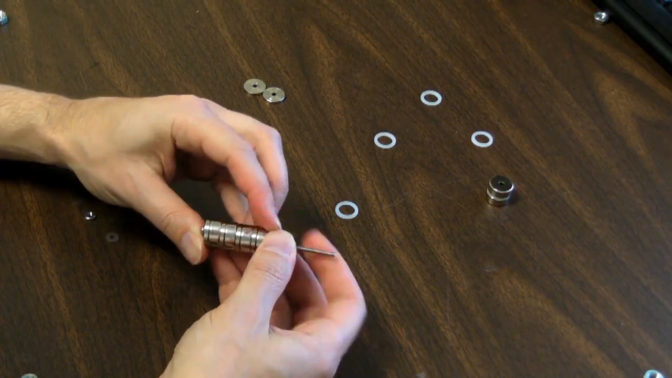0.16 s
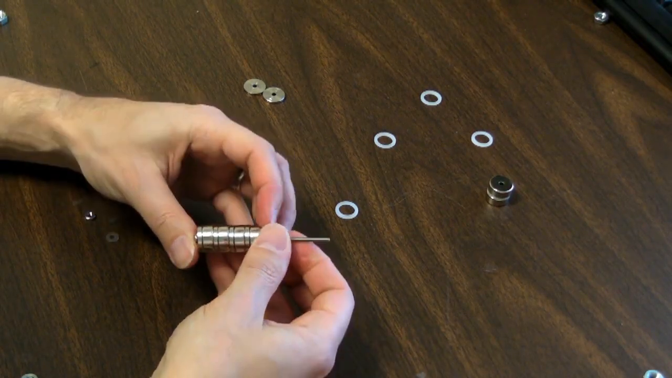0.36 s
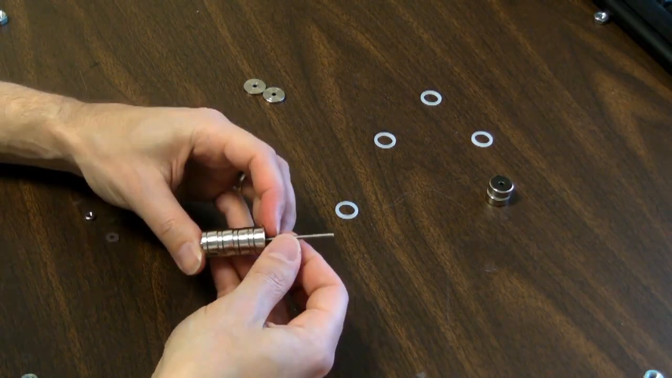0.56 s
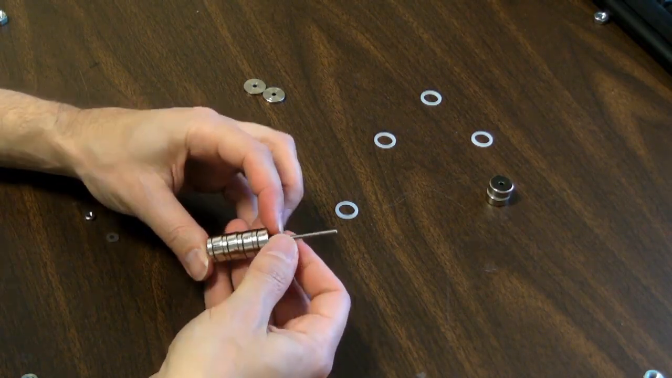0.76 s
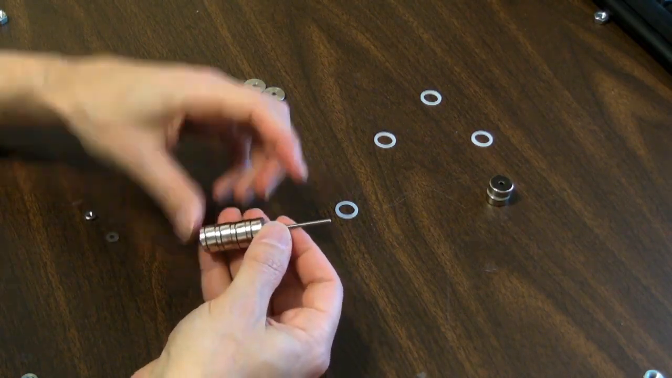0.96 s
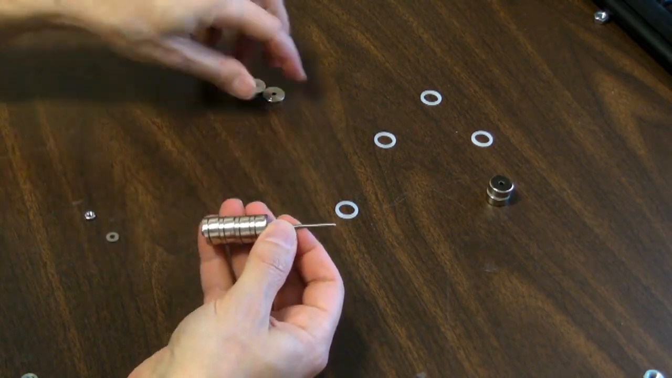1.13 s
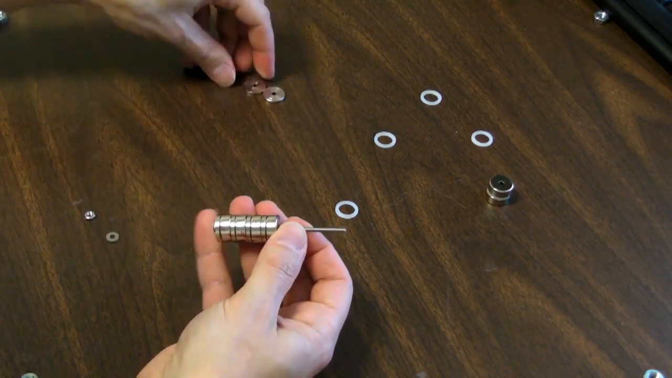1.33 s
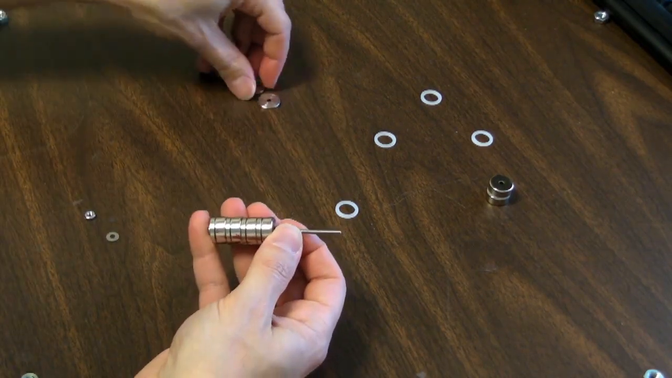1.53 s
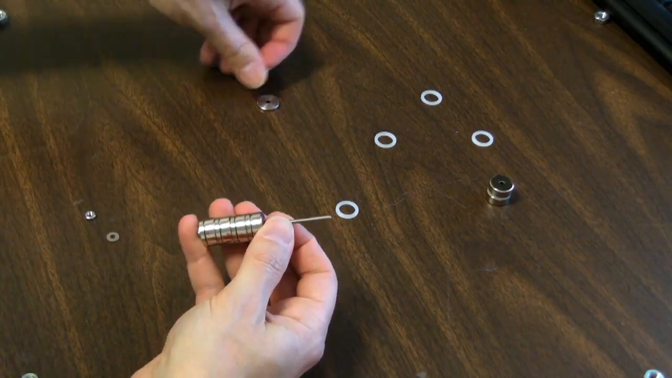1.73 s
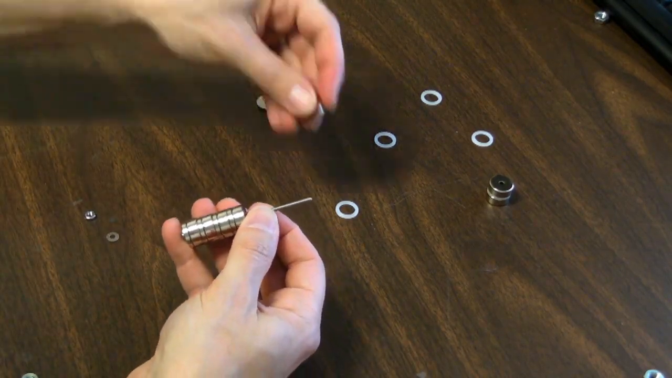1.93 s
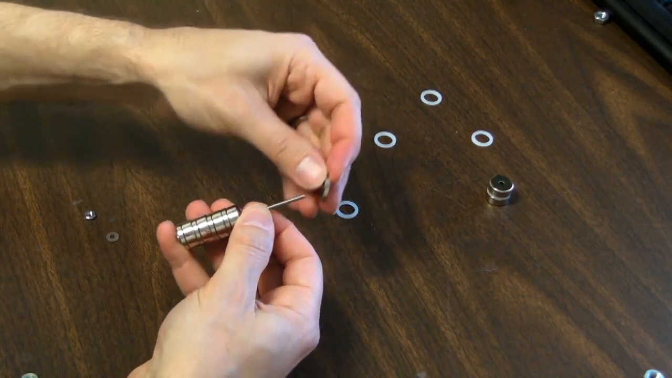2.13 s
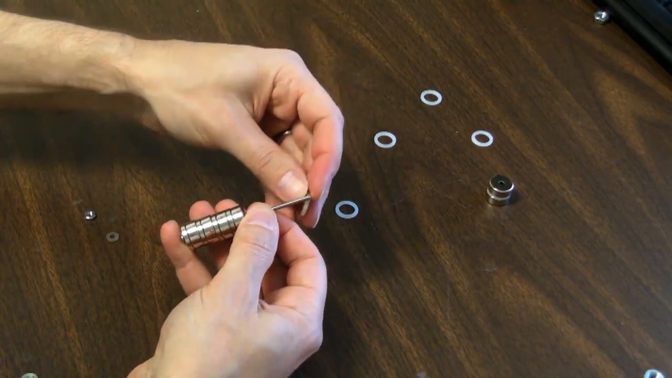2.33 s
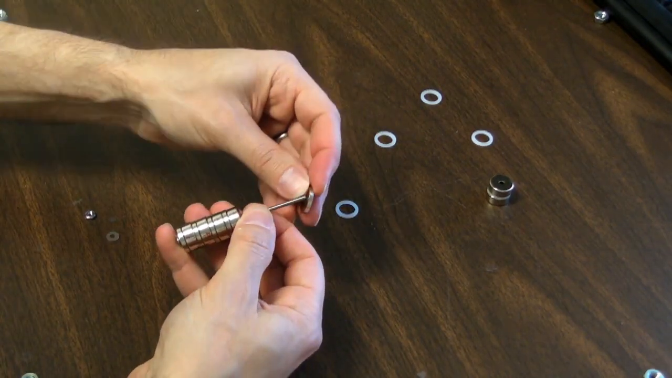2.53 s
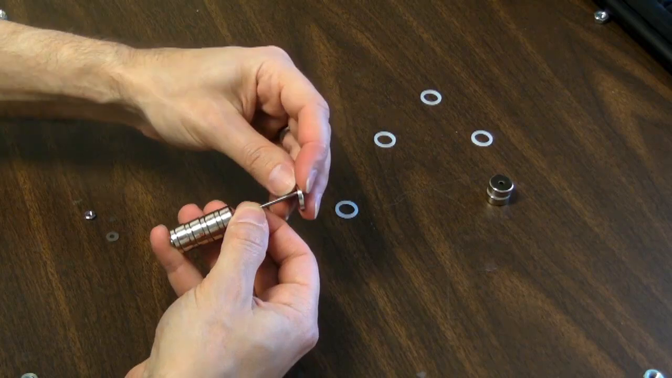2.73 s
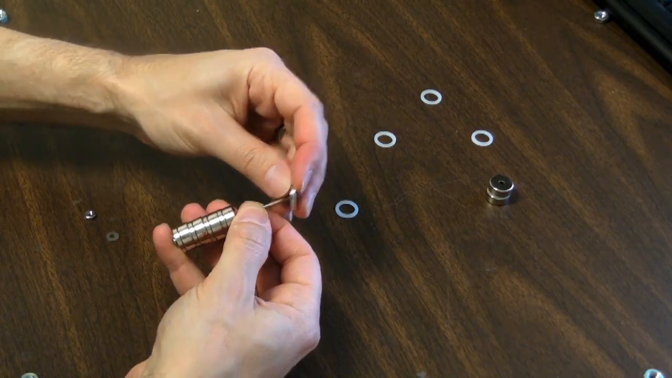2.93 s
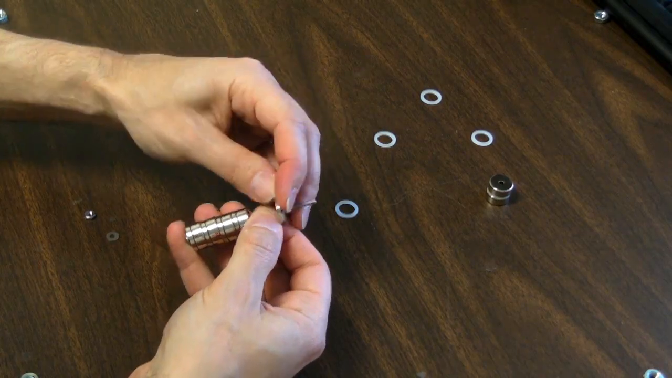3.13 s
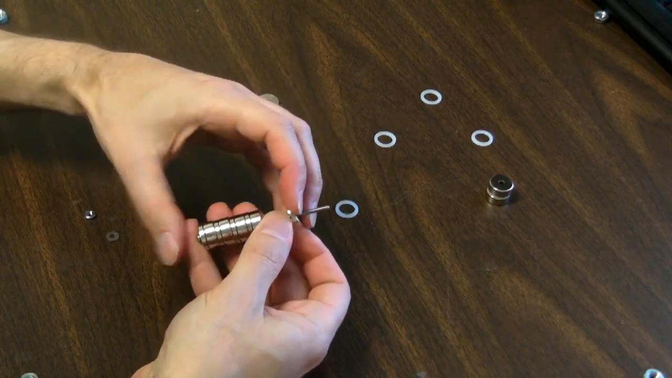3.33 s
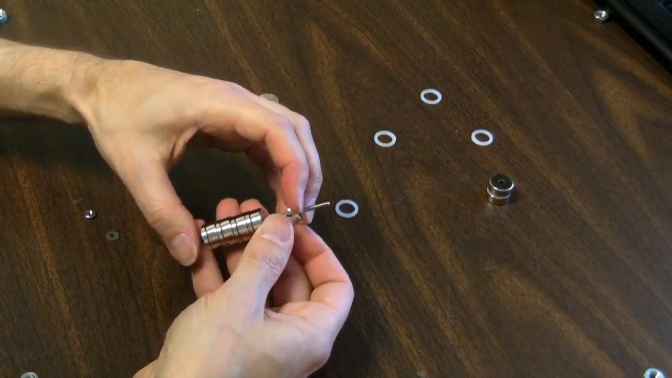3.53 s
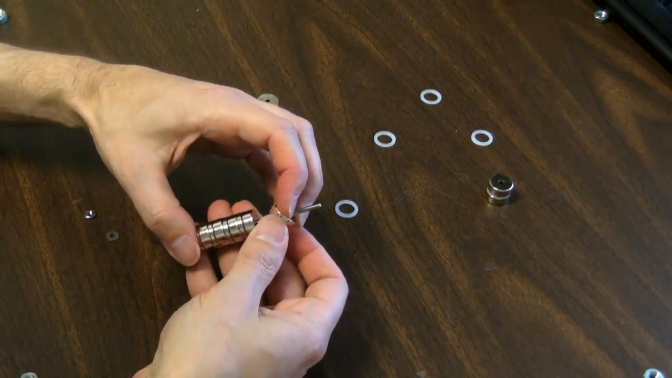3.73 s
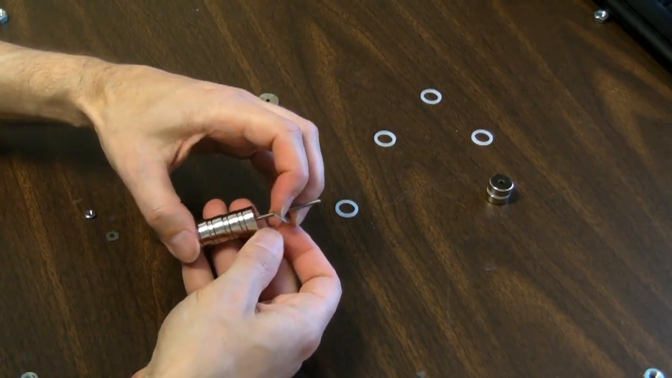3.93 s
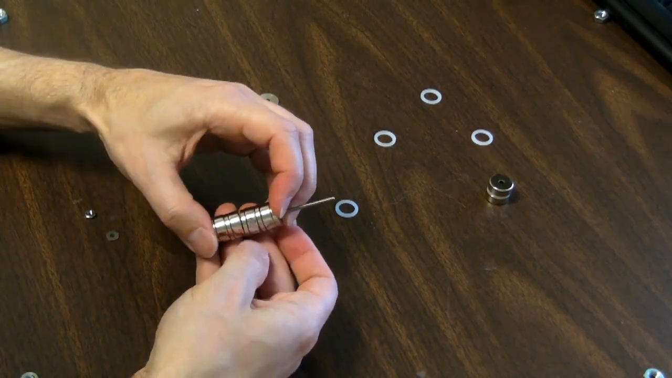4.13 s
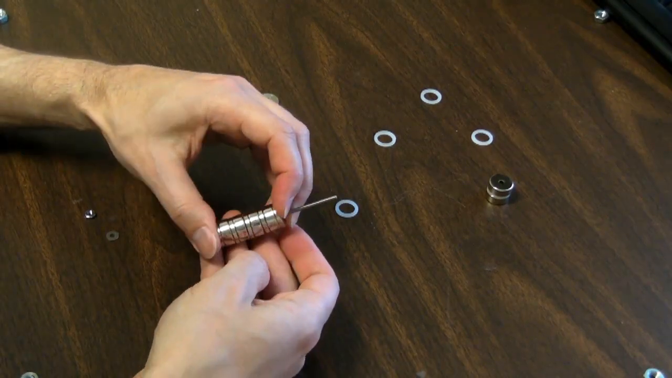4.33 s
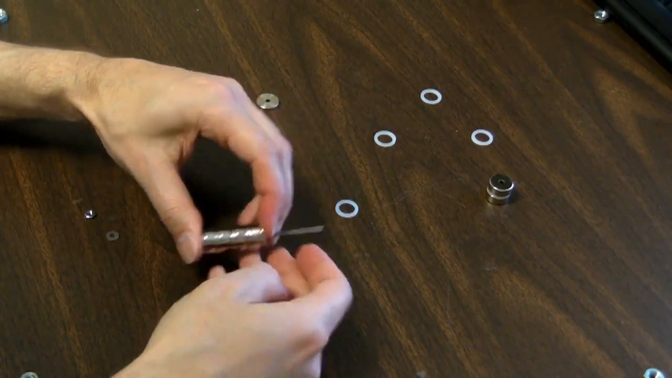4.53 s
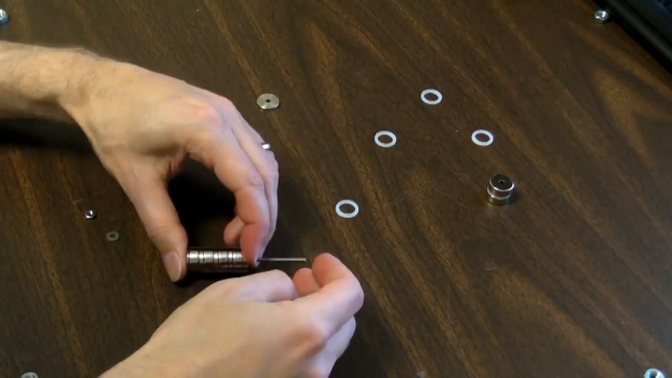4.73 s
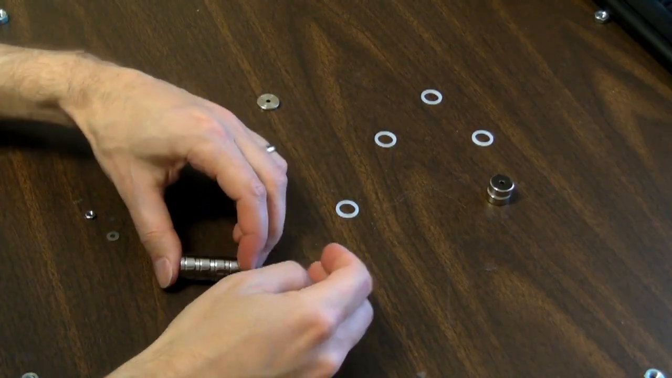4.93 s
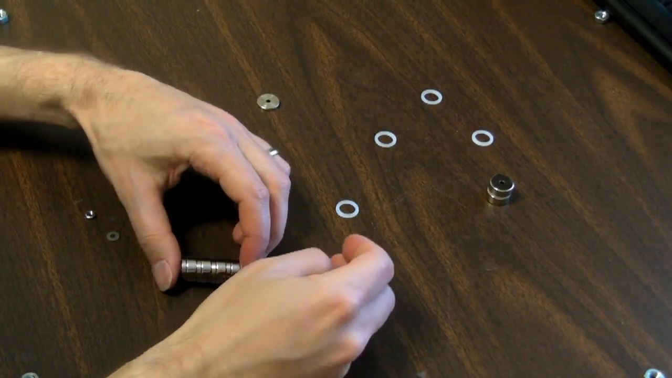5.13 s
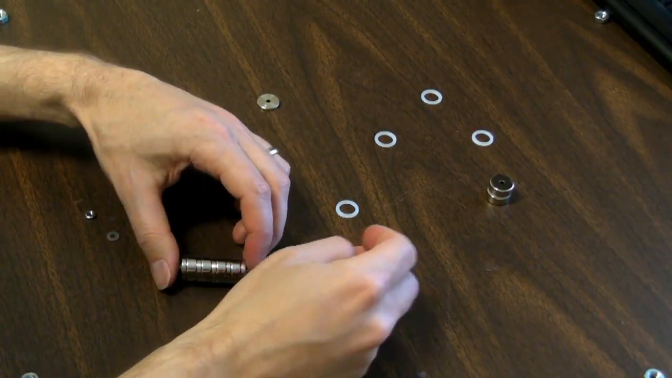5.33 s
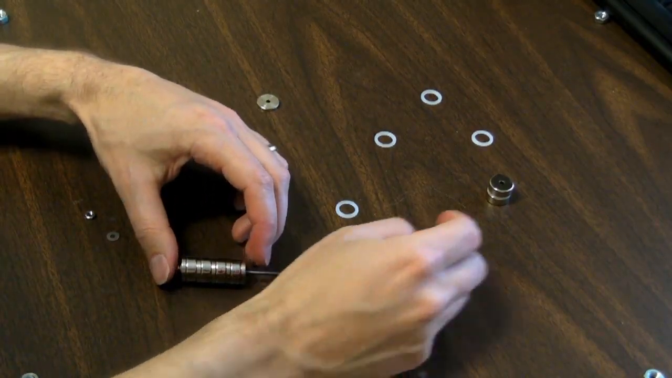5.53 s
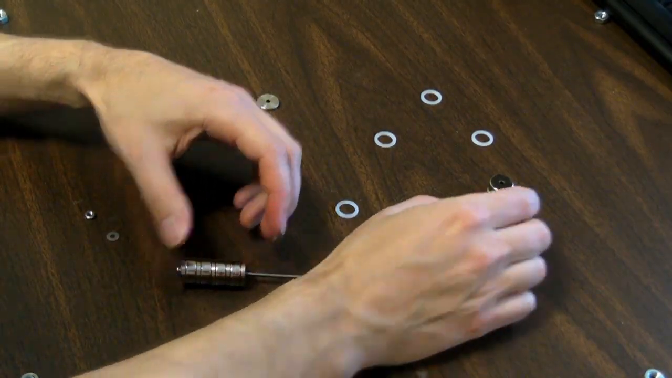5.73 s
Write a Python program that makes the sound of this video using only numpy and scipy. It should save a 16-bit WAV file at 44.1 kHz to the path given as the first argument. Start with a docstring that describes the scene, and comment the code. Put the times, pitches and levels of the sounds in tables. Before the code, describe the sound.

Small metallic clicks and scrapes end in two sharp magnetic snaps and a brief rattle on wood, over faint hum.

```python
"""A small room, ringing over the hum of appliances. Skin and sleeve brush; fingers knock on a wooden
table, drag washers over it and flip one up. Hands thread a steel washer on a screw: it rubs and
chatters over the thread, then snaps onto a stack of ring magnets. The stack is laid down and rocks
to rest. Blows ring decaying modes of wood, steel and stack; friction is a train of tiny slips."""
import sys
import numpy as np
from scipy import signal
from scipy.fft import rfft, irfft
from scipy.io import wavfile
from scipy.ndimage import uniform_filter1d, minimum_filter1d

SR = 44100
rng = np.random.default_rng(int(sys.argv[2]) if len(sys.argv) > 2 else 0)


def inscribe(sig):
    """Save sig as 16-bit PCM at rate SR to the path in sys.argv[1].

    A 1-D sig is mono; a 2-D sig holds one channel per row.
    Samples are clipped to [-1, 1] before scaling.
    """
    pcm = np.round(np.clip(np.atleast_2d(sig).T, -1, 1) * 32767)
    wavfile.write(sys.argv[1], SR, pcm.astype(np.int16))


N = 259296
T = np.arange(N) / SR

# fan and microphone hiss: f/Hz, density/dB
AIR_SPECTRUM = [(12, -65), (20, -31), (86, -12), (116, -18), (145, -10.5), (177, -11), (284, -20.5),
                (346, -8.5), (376, -8), (497, -11.5), (541, -12.5), (823, -19), (1750, -20.5),
                (13100, -25.5), (15900, -27)]
# hiss, left-right: f/Hz, coherence/0-1
AIR_COHERENCE = [(60, 0.03), (130, 0.63), (290, 0.7), (640, 0.69), (1410, 0.27), (3100, 0.68), (6820, 0),
                 (15000, 0)]
# motor lines: f/Hz, level/dB
HUM_LINES = [(351, -66), (533.7, -67.5), (299, -80.5), (432.5, -74), (596, -81.5), (668, -78.5),
             (1150, -91.5)]
# room decay: f/Hz, t60/s
ROOM_DECAY = [(200, 0.45), (800, 0.31), (2500, 0.2), (4000, 0.29), (6500, 0.27), (12000, 0.25),
              (16000, 0.24)]
# room tail, left-right: f/Hz, coherence/0-1
ROOM_COHERENCE = [(200, 1), (800, 0.82), (2500, 0.65), (6000, 0.03), (12000, 0)]
# skin and sleeve: t/s, level/dB
BRUSH_LEVELS = [(0, -85), (.8, -79), (1., -59.5), (1.5, -80), (2., -82), (4.4, -83), (4.55, -60),
                (4.7, -61), (5.35, -60.5), (5.65, -56.5), (5.88, -58)]
# skin and sleeve: f/Hz, density/dB
BRUSH_SPECTRUM = [(500, -10), (2000, -4), (5000, -1), (9000, -1), (12500, 1), (15500, -3)]
# washers dragged on wood: t/s, hold/s, level/dB
WOOD_DRAGS = [(1.221, 0.0067, -51.5), (1.27, 0.025, -62), (1.532, 0.01, -42.5), (1.575, 0.027, -52.5)]
# drag noise: f/Hz, density/dB
DRAG_SPECTRUM = [(150, -46), (250, -28), (377, 3), (579, -4), (951, 0.5), (1860, -4), (5370, -6),
                 (8380, -21), (15000, -22)]
# table top: f/Hz, level/dB, t60/s
WOOD_MODES = [(130, -20, .06), (180, -15, .06), (375, -1, .13), (435, -6, .1), (490, -9, .07),
              (572, 0, .12), (633, -1, .12), (700, -9, .06), (780, -9, .07), (905, -1, .1), (985, -7, .06),
              (1210, -5, .06), (1350, -1, .055), (1420, -6, .05), (1495, -4, .05), (1695, 2, .055),
              (1860, -7, .04), (2000, -5, .04), (2200, -1, .045), (2480, -3, .035), (2900, -12, .012),
              (3400, -3, .028), (3900, -9, .009), (4700, -6, .012), (5300, -4, .012), (6100, -10, .004)]
# fingers on the table: t/s, level/dB, softness/0-1 (nail to pad)
FINGER_TOUCHES = [(0.507, -58, .01), (1.221, -50, .02), (1.227, -40, 1), (1.274, -45.5, 0.36),
                  (1.292, -43.5, 0.48), (1.51, -44, 0.94), (1.534, -54, .05)]
# washer flipping up: t/s, knock/dB, tick/dB
WASHER_FLIPS = [(1.730, -24.5, -48), (1.7336, -25, -25), (1.736, -36, -38), (1.748, -44, -53),
                (1.763, -45, -58)]
# stack rocking on the table: t/s, level/dB, contact corner/Hz, node/Hz
STACK_LANDINGS = [(4.810, -25, 1790, 630), (4.815, -31.5, 1600, 657), (4.822, -25, 940, 616),
                  (4.84, -37, 1010, 640), (4.843, -36, 990, 650), (4.943, -22, 2100, 895),
                  (4.947, -29, 1690, 905), (4.953, -25, 1520, 950), (4.960, -30.5, 800, 930),
                  (4.968, -27.5, 1500, 930), (4.984, -28.5, 560, 955), (5.011, -34, 643, 960),
                  (5.024, -37, 630, 380), (5.040, -41.5, 645, 378), (5.062, -36, 560, 380),
                  (5.075, -33, 800, 910), (5.087, -35.5, 610, 950), (5.105, -41.5, 577, 910)]
# magnet stack body: f/Hz, level/dB, t60/s
STACK_MODES = [(338, -13, 0.024), (523, -9, 0.05), (755, -6, 0.016), (1110, -2, 0.026), (1350, -5, 0.018),
               (1800, 7, 0.014)]
# stack jolting in the hand: t/s, level/dB
STACK_THUDS = [(3.318, -46), (3.8348, -42), (3.8418, -37.5), (3.8611, -39.5), (4.0869, -42), (4.0956, -30),
               (4.636, -41), (4.6443, -38)]
# washer and magnets, low modes: f/Hz, level/dB, t60/s
STEEL_LOW_MODES = [(1900, -22, .004), (2400, -9, .004), (2700, -11, .004), (3400, -22, .003),
                   (4100, -9, .003), (4750, -2, .0025), (5300, 0, .0025), (6000, -2, .0025),
                   (6600, -5, .003)]
# washer and magnets, high modes: f/Hz, level/dB, t60/s
STEEL_HIGH_MODES = [(8200, -5, .002), (9500, -6, .002), (10900, -3, .0025), (11800, 0, .0025),
                    (12600, 1, .003), (13600, 0, .0025), (14800, -2, .002)]
# washer rubbing the thread: t/s, hold/s, level/dB, tilt/dB (low minus high modes)
THREAD_RUBS = [(2.326, .003, -54, -2), (2.397, 0.057, -59, -1), (2.866, 0.023, -49.5, 2.5),
               (2.977, 0.049, -38.5, -3), (3, 0.016, -39, -9), (3.046, 0.052, -42, -4),
               (3.177, 0.032, -52.5, 2.5), (3.319, 0.001, -45.5, -1), (3.836, 0.018, -36.5, -8.5),
               (4.078, 0.021, -26, -4.5), (4.087, 0.038, -33.5, -18), (4.637, 0.0034, -31.5, -3.5),
               (4.643, 0.01, -41.5, -4)]
# washer skipping on the thread: t/s, length/s, rate/Hz, first level/dB, last level/dB, tilt/dB
THREAD_SKIPS = [(2.4024, 0.059, 67, -43, -42, 2)]
# steel-on-steel contacts: t/s, level/dB, tilt/dB
STEEL_CONTACTS = [(2.3238, -39, -4), (2.3293, -30, -5), (2.5246, -34, -6), (2.8685, -31, 7),
                  (2.8787, -23, -5), (2.8907, -31, 2), (2.9735, -23, -6), (2.9788, -21, -12),
                  (2.983, -24, -11), (2.9868, -21, -12), (2.9906, -16, -12), (2.9955, -22, -6),
                  (3.0025, -20, -4), (3.006, -19, -2), (3.0095, -22, -6), (3.0128, -21, -8),
                  (3.0203, -19, -1), (3.0301, -19, 0), (3.0511, -22, -1), (3.0692, -20, -3),
                  (3.0752, -20, 0), (3.082, -20, 0), (3.0885, -22, 2), (3.097, -23, 0), (3.1783, -27, 2),
                  (3.186, -35, 11), (3.2119, -35, 5), (3.3182, -23, -5), (3.3221, -32, -6),
                  (3.4126, -44, 12), (3.8357, -21, -5), (3.8372, -17, -5), (3.8416, -19, -9),
                  (3.8611, -21, -4), (3.8645, -25, -4), (4.0694, -16, -11), (4.0726, -17, -6),
                  (4.0764, -13, -5), (4.0817, -7, -13), (4.0869, -6, -9), (4.0935, -12, -3),
                  (4.0952, -6, -2), (4.0956, 2, 0), (4.0959, -3, -2), (4.0971, -4, -8), (4.1012, -9, -15),
                  (4.1085, -13, -14), (4.6361, -10, -8), (4.6443, -4, -19), (4.6484, -17, -10)]


def undb(db):
    return 10 ** (np.asarray(db) / 20)


def unit_rms(x):
    return x / np.sqrt(np.mean(x ** 2))


def along(points, hz):
    """Interpolate (f/Hz, value) points over log frequency."""
    point_hz, values = np.array(points).T
    return np.interp(np.log(hz + 1), np.log(point_hz), values)


def colour(x, spectrum):
    """Shape x by a (f/Hz, level/dB) spectrum."""
    return irfft(rfft(x) * undb(along(spectrum, np.fft.rfftfreq(N, 1 / SR))), N)


def walk(rate_hz):
    """Random steps, smoothed twice."""
    hold = int(SR / rate_hz)
    steps = np.repeat(rng.standard_normal(N // hold + 1), hold)
    return uniform_filter1d(uniform_filter1d(steps, hold), hold)[:N]


def add(out, at_s, x):
    i = int(at_s * SR)
    out[:, i:i + x.shape[-1]] += x[..., :N - i]


def highpass(x, hz):
    """Small things radiate no bass."""
    return signal.sosfilt(signal.butter(3, hz, "highpass", fs=SR, output="sos"), x)


def swell(start_s, hold_s, db, rise_db_s, fall_db_s):
    """Rise-hold-fall gain and its sample mask."""
    on = (T > start_s - .06) & (T < start_s + hold_s + .08)
    t = T[on] - start_s
    return undb(db - rise_db_s * np.maximum(-t, 0) - fall_db_s * np.maximum(t - hold_s, 0)), on


def grit(spread_db, rate_hz):
    """Tiny random slips, a few much larger; rms 1."""
    slips = (rng.random(N) < rate_hz / SR) * rng.standard_normal(N)
    return unit_rms(slips * undb(spread_db * rng.exponential(size=N)))


def ring(modes, samples, rise_s, detune, scatter_db):
    """Decaying modes, peak 1; each blow meets them a little differently."""
    hz, db, t60_s = np.array(modes).T[:, :, None]
    pitch_draw, level_draw, phase = rng.standard_normal((3, len(modes), 1))
    t = np.arange(samples) / SR
    hz = np.minimum(hz * (1 + detune * pitch_draw), .45 * SR)
    envelopes = undb(db + scatter_db * level_draw) * 1000 ** (-t / t60_s)
    y = np.sum(envelopes * np.sin(2 * np.pi * (hz * t + phase)), axis=0)
    y *= 1 - np.exp(-(t / rise_s) ** 2)
    return y / np.abs(y).max()


def air():
    """Fan and microphone hiss, partly coherent left to right."""
    coherence = np.clip(along(AIR_COHERENCE, np.fft.rfftfreq(N, 1 / SR)), 0, .99)
    mid, side = (rfft(colour(rng.standard_normal(N), AIR_SPECTRUM)) for _ in range(2))
    hiss = irfft(np.sqrt(1 + coherence) * mid + np.sqrt(1 - coherence) * side * [[1], [-1]], N)
    return undb(-57 + 1.03 * walk(4.47)) * unit_rms(hiss)


def hum(throb_hz=119, period_s=.751, dip_s=.7):
    """Wavering motor lines; the lowest throbs."""
    def tone(hz):
        drift_rad = 15.35 * np.cumsum(walk(12)) / SR
        return np.sqrt(2) * np.sin(2 * np.pi * (hz * T + rng.random()) + drift_rad)

    lines = sum(undb(db + 2.1 * walk(4.4)) * tone(hz) for hz, db in HUM_LINES)
    throb = 1 - .58 * np.cos(2 * np.pi * (T - dip_s) / period_s)
    return lines + undb(-70) * throb * tone(throb_hz)


def room(x):
    """Diffuse stereo tail, decaying by half-octave band."""
    t, tail = np.arange(20000) / SR, 0
    for hz in 125 * 2 ** np.arange(0, 7.1, .5):
        band = signal.butter(2, [hz / 2 ** .22, hz * 2 ** .22], "bandpass", fs=SR, output="sos")
        common, own = rng.standard_normal(len(t)), rng.standard_normal((2, len(t)))
        coherence = np.clip(along(ROOM_COHERENCE, hz), 0, 1)
        noise = np.sqrt(coherence) * common + np.sqrt(1 - coherence) * own
        tail += signal.sosfilt(band, noise) * 1000 ** (-t / along(ROOM_DECAY, hz))
    tail *= 1 - np.exp(-t / .00036)
    return signal.fftconvolve(x.mean(axis=0)[None], tail)[:, :N]


def brush():
    """Skin and sleeve friction: soft, flickering hiss."""
    hiss = np.array([unit_rms(colour(grit(1.02, 8000), BRUSH_SPECTRUM)) for _ in range(2)])
    flicker_db = 3 * walk(15)
    return undb(np.interp(T, *np.array(BRUSH_LEVELS).T) + flicker_db) * hiss


def drags():
    """Washers slip over the wood grain."""
    out, rough = np.zeros(N), unit_rms(colour(grit(1.1, 3000), DRAG_SPECTRUM))
    for row in WOOD_DRAGS:
        gain, on = swell(*row, rise_db_s=1100, fall_db_s=604)
        out[on] += gain * rough[on]
    return out


def knock(out, at_s, db, low_hz, corner_hz, node_hz=20, tick_db=5):
    """Blow on wood: harder contact, shorter push, higher modes. Modes near node_hz barely move."""
    hz, mode_db, t60_s = np.array(WOOD_MODES).T
    node_db = 11.5 * np.exp(-(np.log2(hz / node_hz) / .17) ** 2)
    rolloff_db = 10 * np.log10((1 + (hz / corner_hz) ** 6) * (1 + (low_hz / hz) ** 6))
    modes = np.column_stack([hz, mode_db - node_db - rolloff_db, t60_s])
    body = ring(modes, 12000, rise_s=.0004, detune=.004, scatter_db=1.5)
    push = np.exp(-(np.arange(-30, 31) * np.clip(corner_hz, 1200, 3000) * 3.67 / SR) ** 2)
    tick = np.diff(push, n=2)
    body[:len(tick)] += undb(tick_db) * min(corner_hz / 1500, 1) ** 2 * tick / np.abs(tick).max()
    add(out, at_s, undb(db) * highpass(body, .87 * low_hz))


def steel(width):
    """Brief low and high rings of washer and magnets; width scales the part unique to each side."""
    def blow():
        return np.array([ring(modes, 400, rise_s=.00012, detune=.04, scatter_db=2)
                         for modes in (STEEL_LOW_MODES, STEEL_HIGH_MODES)])

    shared, sides = blow(), np.stack([blow(), blow()], axis=1)
    return shared[:, None] + np.array([.6, 1.05])[:, None, None] * width * sides


def blend(low, high, tilt_db):
    return undb(tilt_db / 2) * unit_rms(low) + undb(-tilt_db / 2) * unit_rms(high)


def click(out, at_s, db, tilt_db):
    """One steel contact and its reflection off the table."""
    hit = blend(*steel(width=.34), tilt_db)
    pan_db = .5 + .8 * rng.standard_normal()
    hit /= np.abs(hit.mean(axis=0)).max()
    hit *= undb(db + np.array([[pan_db], [-pan_db]]) / 2)
    add(out, at_s, hit)
    add(out, at_s + .0014, undb(-14) * hit[::-1])


def fingers():
    """Table knocks, from bright nail to dull pad."""
    out = np.zeros((2, N))
    nail_hz, pad_hz = np.array([450, 5000]), np.array([60, 187])  # driven band edges
    for at_s, db, softness in FINGER_TOUCHES:
        band_hz = nail_hz * (pad_hz / nail_hz) ** softness
        knock(out, at_s, db, *band_hz)
    return out


def flip():
    """A nail scrapes under a washer and flips it; the light washer drives only high wood modes."""
    out, response = np.zeros((2, N)), np.zeros((1, N))
    contact = dict(low_hz=1920, corner_hz=4660, node_hz=1550, tick_db=-8)
    for at_s, knock_db, tick_db in WASHER_FLIPS:
        knock(out, at_s, knock_db, **contact)
        click(out, at_s, tick_db, tilt_db=18)
    gain, on = swell(1.726, hold_s=.0027, db=-42.5, rise_db_s=650, fall_db_s=1500)
    knock(response, 0, 0, **contact)
    scrape = np.convolve(grit(.93, 2500)[on], response[0, :len(gain)])
    out[:, on] += gain * unit_rms(scrape[:len(gain)])
    return out


def landing():
    """The stack lands on an edge and rocks to rest; harder contacts jolt its steel more."""
    out = np.zeros((2, N))
    for at_s, db, corner_hz, node_hz in STACK_LANDINGS:
        low_hz = 334 + .017 * corner_hz
        knock(out, at_s, db, low_hz, corner_hz, node_hz)
        jolt_db = db - 10 + 9 * np.log2(corner_hz / 2100)
        click(out, at_s, jolt_db, tilt_db=9.6)
    return out


def rubs(ways=5):
    """Stick-slip on the thread; the contact wanders, so it rings in several ways."""
    out, slip_trains = np.zeros((2, N)), [grit(1.6, 2200) for _ in range(ways)]
    for start_s, hold_s, db, tilt_db in THREAD_RUBS:
        gain, on = swell(start_s, hold_s, db, rise_db_s=990, fall_db_s=752)
        for slips in slip_trains:
            low, high = (signal.fftconvolve(slips[None, on], response)[:, :len(gain)]
                         for response in steel(width=1))
            out[:, on] += gain * blend(low, high, tilt_db) / np.sqrt(ways)
    return out


def chatter(max_ticks=14):
    """The washer skips from turn to turn in nearly even ticks."""
    out = np.zeros((2, N))
    for start_s, length_s, rate_hz, first_db, last_db, tilt_db in THREAD_SKIPS:
        for i, (jitter, scatter) in enumerate(rng.standard_normal((max_ticks, 2))):
            delay_s = (i + .08 * jitter) / rate_hz
            if delay_s < length_s:
                db = first_db + (last_db - first_db) * delay_s / length_s + 1.5 * scatter
                click(out, start_s + delay_s, db, tilt_db)
    return out


def snaps():
    """The washer strikes thread and magnets; hard snaps also jolt the stack's dull body."""
    out = np.zeros((2, N))
    for row in STEEL_CONTACTS:
        click(out, *row)
    for at_s, db in STACK_THUDS:
        add(out, at_s, undb(db) * ring(STACK_MODES, 3000, rise_s=.0005, detune=.022, scatter_db=3.9))
    return out


def scene():
    """Metal and table excite the room, over the background."""
    metal = highpass(snaps() + chatter() + rubs(), 260)
    table = highpass(fingers() + flip() + landing() + drags(), 77)
    reverb = room(undb(-35.5) * metal + undb(-30.5) * table)
    return metal + table + reverb + brush() + air() + hum()


def record(dry, top_hz=15550):
    """Steep low-pass; a fast look-ahead limiter holds peaks to full scale."""
    cut = signal.sosfilt(signal.ellip(10, .2, 70, top_hz, fs=SR, output="sos"), dry)
    overload = np.maximum(np.abs(cut).max(axis=0), 1)
    gain = minimum_filter1d(1 / overload, size=129)
    return cut * uniform_filter1d(gain, size=65)


dry = scene()
out = record(dry)
inscribe(out)
```